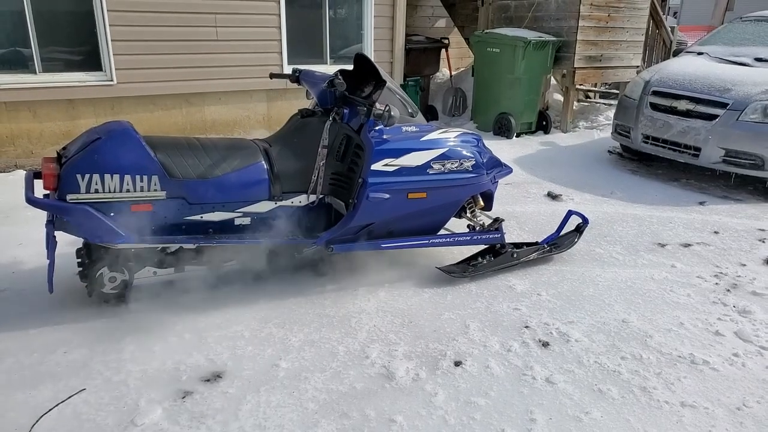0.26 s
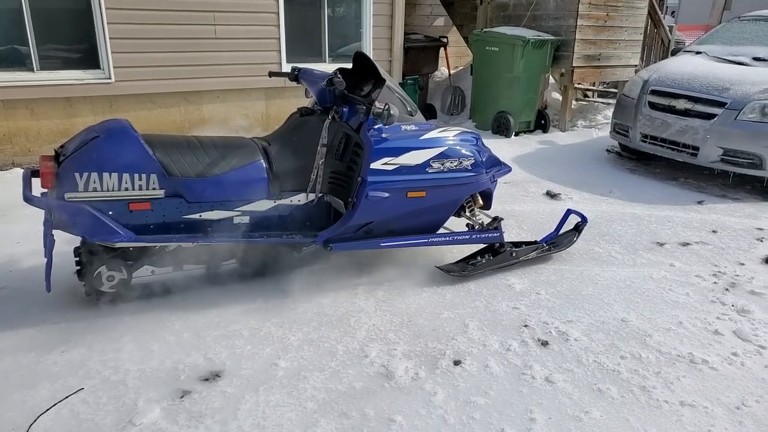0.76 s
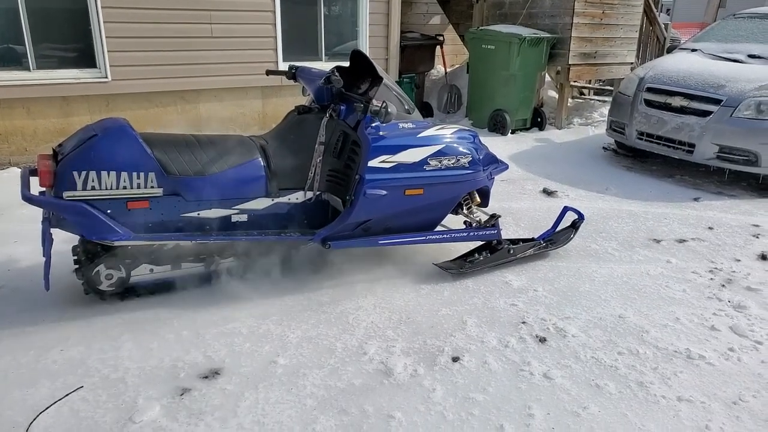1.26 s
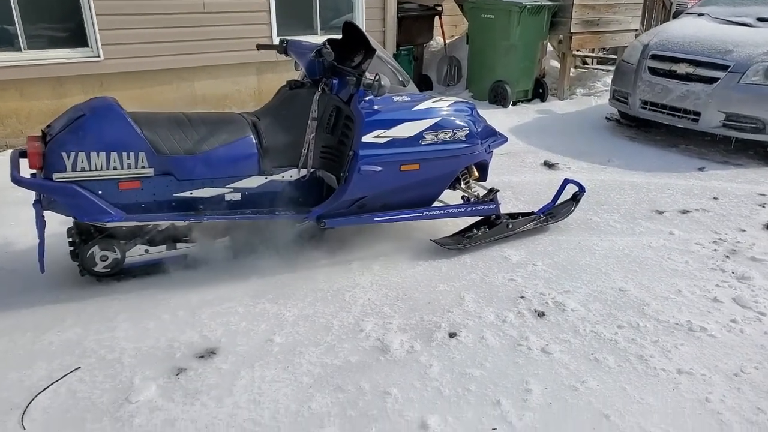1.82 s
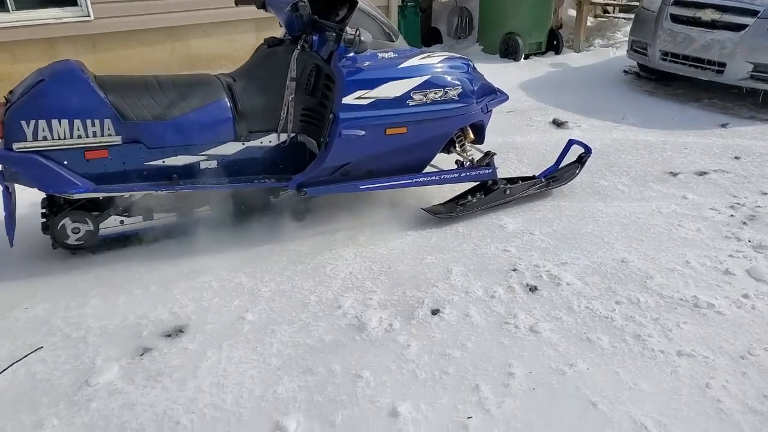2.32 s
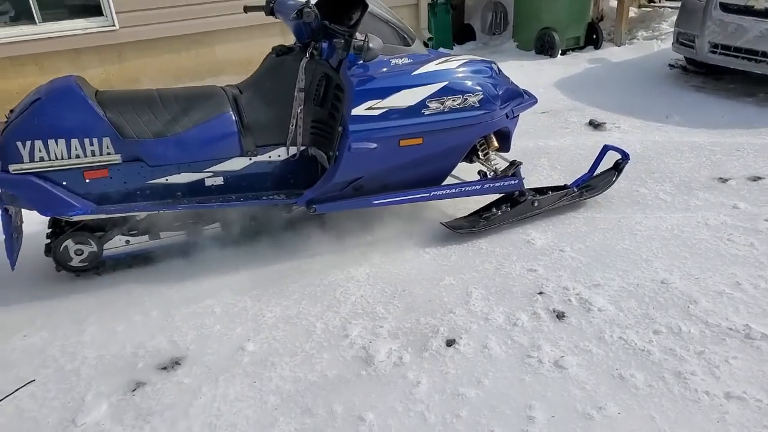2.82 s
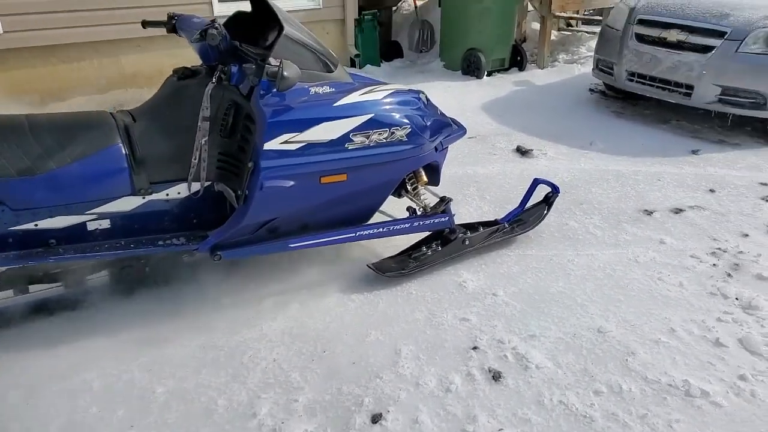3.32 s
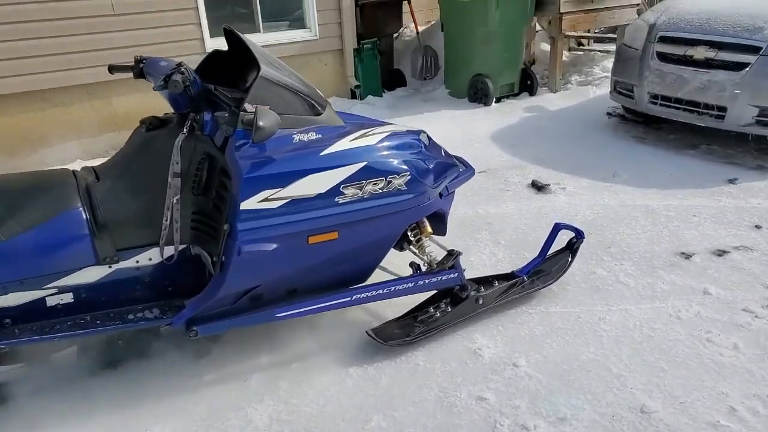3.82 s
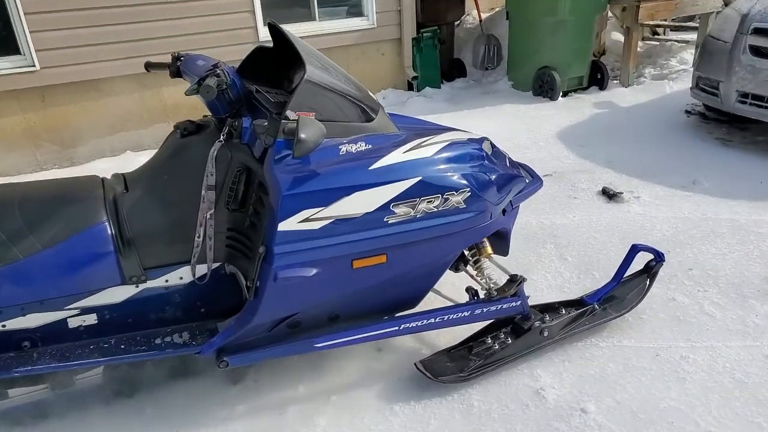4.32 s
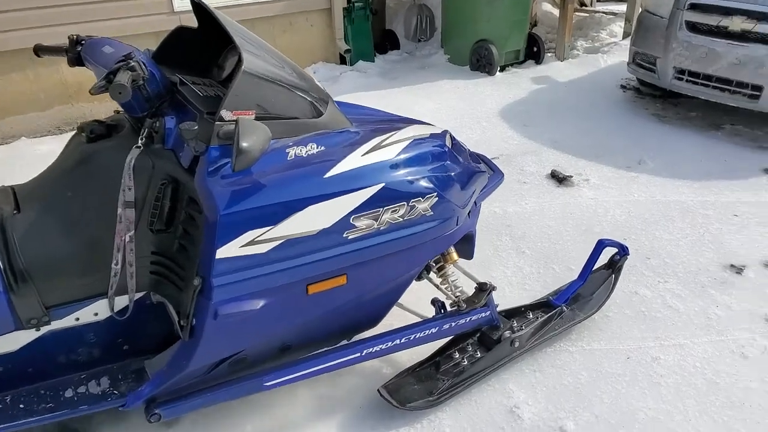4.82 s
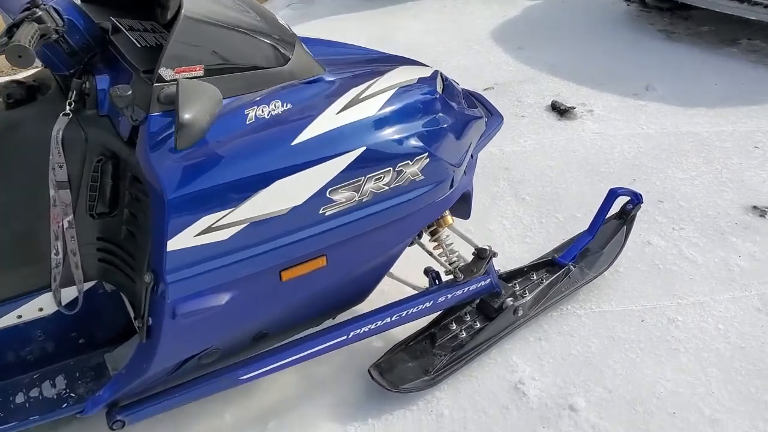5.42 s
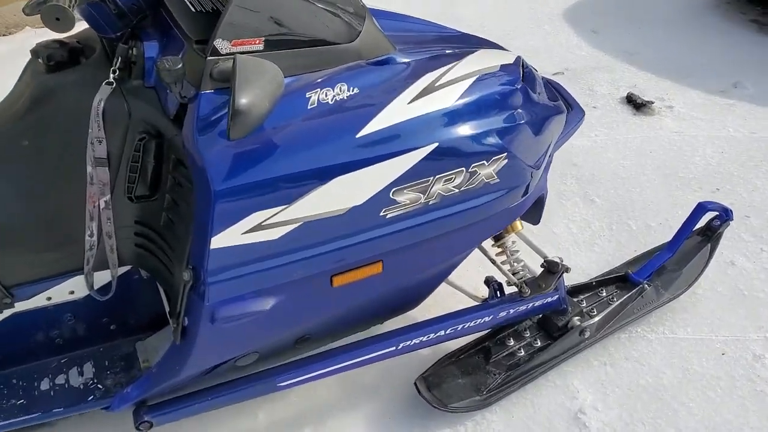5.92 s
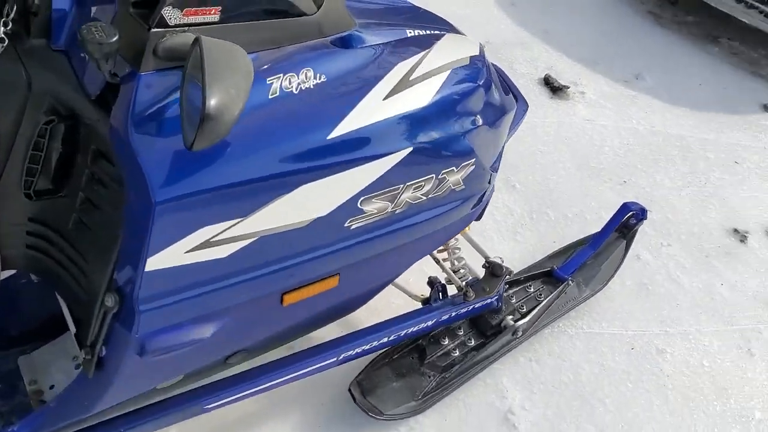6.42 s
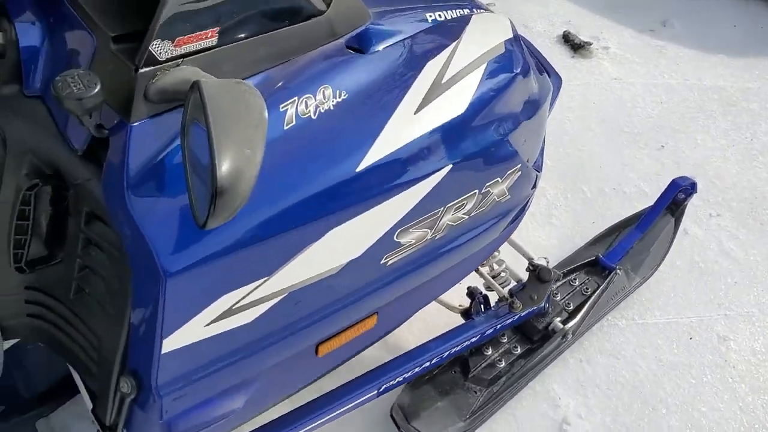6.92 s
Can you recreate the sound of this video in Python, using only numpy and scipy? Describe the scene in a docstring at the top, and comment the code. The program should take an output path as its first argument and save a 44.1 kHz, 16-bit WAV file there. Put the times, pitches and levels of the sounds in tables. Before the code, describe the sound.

From 0 s to about 7.1 s a two-stroke snowmobile idles roughly on snow beside a house, already running and never revving. Exhaust bangs arrive unevenly, about eighteen a second, in pairs, clusters and gaps. Each is a short low-mid boom with a crack, a spit of gas, a faint clutch clack and a hoarse bark; stronger ones stand out near 0.25, 0.6, 1.27, 2.55, 2.93, 3.4, 3.76 and 4.9 s. Between them weak strokes drone, tick and rustle over silencer rumble, with occasional soft thumps. Loose metal knocks once at 2.45 s. Until 3.1 s the stereo microphone stays at the side, with a short slap from the wall. By 3.6 s it is at the footboard, hissier and brighter. From 5.2 s it nears the hood: mechanical rustle rises, gas spits feel closer and their echo fades. The idle continues to the end.

```python
"""A three-cylinder two-stroke snowmobile idles on snow beside a house while the listener walks up to its hood.
From the start the engine rustles, ticks and drones, since most strokes burn weakly. At uneven moments a
built-up charge goes off: a crack, a spit of gas, a clack of the clutch, a boom in the pipe and a hoarse bark.
A short echo comes back from the house wall, and long gaps may hold a soft thump. At 2.4 s loose metal knocks.
From 3.1 s the listener goes from the side to the footboard, then from 5.2 s towards the hood."""
import sys
import numpy as np
from scipy import signal
from scipy.fft import rfft, irfft
from scipy.io import wavfile
from scipy.ndimage import uniform_filter1d

SR = 44100
rng = np.random.default_rng(int(sys.argv[2]) if len(sys.argv) > 2 else 0)


def wav_record(signal):
    """Record a signal, one row per channel, as 16-bit PCM in the file named by sys.argv[1]."""
    frames = np.transpose(np.atleast_2d(signal))
    bounded = np.clip(frames, -1, 1)
    # unit amplitude maps onto the largest positive 16-bit level
    quanta = np.round(bounded * 32767).astype(np.int16)
    wavfile.write(sys.argv[1], SR, quanta)


N = 315756
TIME = np.arange(N) / SR  # seconds

# bangs of the exhaust: (time [s], strength of the burn [dB])
BANGS = [(0.0004, -12.5), (0.0358, -9.5), (0.1235, -5.5), (0.1488, -8), (0.2483, 0), (0.2724, -7),
         (0.2969, -11), (0.309, -10.5), (0.407, -11), (0.4198, -9.5), (0.497, -7.0), (0.51, -10),
         (0.5606, -7), (0.6106, -6.0), (0.6228, -1), (0.6839, -16), (0.7098, -6.5), (0.8341, -9.5),
         (0.8849, -4.5), (0.897, -7), (0.9466, -8.5), (1.0093, -7.5), (1.06, -14), (1.0995, -12.0),
         (1.1641, -6), (1.2151, -12.0), (1.2541, -12), (1.267, -1.5), (1.3174, -9.5), (1.408, -6.5),
         (1.4614, -4), (1.487, -11), (1.5263, -10.5), (1.6329, -9.5), (1.6603, -6), (1.6866, -8),
         (1.753, -5.5), (1.7655, -9.5), (1.8154, -3), (1.8807, -9.5), (1.907, -8.5), (1.9578, -10),
         (2.0361, -14), (2.0494, -4), (2.061, -6), (2.111, -7.5), (2.228, -10.5), (2.241, -8),
         (2.2548, -5.5), (2.3042, -8), (2.3892, -9), (2.4091, -6.5), (2.4597, -8.0), (2.5239, -6.5),
         (2.5492, -1.0), (2.61, -9), (2.7128, -9.5), (2.7642, -5.5), (2.8291, -6.5), (2.919, -17),
         (2.932, 0.0), (2.9566, -7.5), (2.9807, -7.5), (3.107, -6.0), (3.1316, -5.5), (3.2197, -5.5),
         (3.284, -5.5), (3.3345, -10), (3.3847, -0.5), (3.4342, -8.5), (3.4463, -11), (3.5996, -10.0),
         (3.6132, -8.5), (3.626, -7.5), (3.638, -9), (3.7635, 0), (3.813, -5.5), (3.8605, -12.0),
         (3.96, -6.0), (3.972, -6), (4.0215, -1.5), (4.082, -6.5), (4.1054, -6.5), (4.217, -11.5),
         (4.2295, -7.0), (4.3319, -7.5), (4.3579, -2), (4.3835, -13), (4.4223, -6), (4.4465, -5.0),
         (4.537, -12.5), (4.5758, -9), (4.601, -4), (4.6407, -7), (4.7019, -8), (4.7269, -4),
         (4.8107, -8.5), (4.8489, -8.5), (4.8997, -0.5), (4.9967, -3), (5.1354, -6), (5.1986, -6.5),
         (5.225, -8.5), (5.2887, -6), (5.3773, -4.5), (5.3908, -2.5), (5.44, -6), (5.525, -5.5),
         (5.6165, -2), (5.6277, -5.5), (5.6758, -6), (5.7731, -6.5), (5.8992, -6), (5.9112, -2),
         (6.008, -9.5), (6.11, -6), (6.1617, -5), (6.213, -1.5), (6.2644, -7.5), (6.3135, -9),
         (6.4179, -5.5), (6.4692, -9), (6.4824, -9.5), (6.5072, -9), (6.572, -5.0), (6.6235, -10),
         (6.6739, -4.0), (6.726, -12.5), (6.7758, -9), (6.8772, -6), (6.9266, -7), (6.9772, -3.5),
         (7.028, -8.5), (7.039, -5), (7.1373, -7.0)]
# the walk: (time [s], place [0 side, 1 footboard, 2 hood])
WALK_PLACES = [(0, 0.082), (3.1, 0), (3.6, 1.026), (5.15, 1.04), (5.7, 1.61), (7.1, 1.93)]
# running noise along the walk: (time [s], relative level [dB])
RUNNING_LEVEL = [(0.0, -28), (3.7, -28), (4.57, -25), (5.74, -25), (7.16, -21)]
# colour of the running noise from the side: (frequency [Hz], relative level [dB])
SIDE_COLOUR = [(260, -15), (450, -2), (741, -2), (951, -16), (1170, -4), (1390, -11.5), (1540, -12),
               (1810, -9.5), (2360, -21.5), (3120, -15.5), (4120, -30), (5220, -24.5), (6790, -33),
               (8460, -38), (15000, -52)]
# the same at the footboard: (frequency [Hz], relative level [dB])
BOARD_COLOUR = [(260, -10), (450, -2), (794, -4), (882, -9.5), (1150, -0.5), (1470, -10.5), (1750, -5),
                (2100, -21), (2400, -22), (3190, -15.5), (4170, -32), (6430, -21), (8540, -34),
                (14800, -26.5), (16000, -38)]
# the same over the hood: (frequency [Hz], relative level [dB])
HOOD_COLOUR = [(260, 6.5), (450, -6), (507, -8.5), (726, -9.5), (950, -1.5), (1140, 2), (1260, -31),
               (1360, -22), (1860, -12), (2790, -27), (3490, -31), (4110, -30.5), (6060, -40), (9340, -45),
               (15100, -32), (16000, -45)]
# gas rumbling through the silencer: (frequency [Hz], relative level [dB])
RUMBLE_COLOUR = [(20, -19), (40, -10.5), (55, -5.5), (80, -20), (105, 3.5), (135, 0), (170, 0.5),
                 (205, 3.5), (245, -4.5), (310, -4.5), (400, -1), (520, -25), (900, -45)]
# steel shell of the pipe, struck by the pressure front: (base frequency [Hz], width [Hz],
# relative level from the side [dB], at the footboard [dB], over the hood [dB])
SHELL_MODES = [(1119, 112, -24, -12.5, -19), (1825, 123, -5.5, -10.5, -16), (1983, 236, 0, 0.5, -3.5),
               (2290, 394, -2, -1.5, 3), (3130, 289, -6.5, -2.5, -37), (3400, 258, -11, -6.5, -24.5)]
# colour of the escaping gas: (frequency [Hz], relative level [dB])
SPIT_COLOUR = [(2000, 2), (2800, -26), (3400, -17), (4250, -13.5), (5250, 2), (5900, 0), (6850, 1),
               (8600, -13), (11000, -4.5), (13000, -9), (15200, 1.5), (16200, -4)]
# rattle of the clutch: (base frequency [Hz], width [Hz], relative level [dB])
CLUTCH_MODES = [(1767, 25, -10.5), (3000, 260, 2.5), (3250, 210, -8), (3600, 280, -14)]
# clutch as heard from the side, at the footboard and over the hood: (relative level [dB])
CLUTCH_PLACE_DB = [-31.5, -33.5, -41]
# exhaust pipe and silencer: (frequency [Hz], width [Hz], relative level [dB])
PIPE_MODES = [(95.3, 25.6, -8), (121.2, 77, -9.5), (219, 15.8, -17.5), (313.4, 86.1, -1.5),
              (322.8, 57.4, 2.25), (340.7, 32, -14), (473.4, 66, -21)]
# hoarse colour of the outlet: (frequency [Hz], relative level [dB])
BARK_COLOUR = [(200, -84), (420, -5), (560, 0.5), (680, -3), (850, -5.5), (1100, -6), (1400, -7),
               (1750, -7.5), (2500, -29), (5000, -35)]
# a lone knock of loose metal: (time [s], level [dB])
KNOCKS = [(2.4489, -21.5)]
# ring of the knock: (base frequency [Hz], width [Hz], relative level [dB])
KNOCK_MODES = [(1210, 140, -3), (1650, 360, -8), (2720, 900, -6), (5200, 2500, -20)]
# how much more the left microphone hears than the right: (frequency [Hz], difference [dB])
EAR_BALANCE = [(60, -0.5), (110, 1), (200, 0.5), (380, -1.5), (700, -1.5), (1290, 4), (2380, -0.5),
               (4400, -5), (8120, 3.5), (15000, 1)]

STROKE_S = .0127  # rough spacing, used to count the strokes between bangs
# the boom grows slowly with the strength: relative level at 0 dB strength, dB per dB, dB per step of the walk
BOOM_DB, BOOM_SLOPE, BOOM_NEAR_DB = 0.78, 0.29, -0.88
# the crack grows fast, until the pressure front is fully steep at the knee: relative top level, dB per dB, knee
CRACK_DB, CRACK_SLOPE, CRACK_KNEE_DB = -20, 1.23, -3.5
# only strong burns spit much: relative level at 0 dB strength, dB per dB, dB per step of the walk
SPIT_DB, SPIT_SLOPE, SPIT_NEAR_DB = -27.5, 1.76, 3.5
GRAIN_HZ, GRAIN_DB = 1104, 2.5  # tiny gusts in the spitting gas: how often they change, and depth
# after this many strokes the cylinders have refilled and a soft thump may come: chance, relative level
REFILL_STROKES, THUMP_CHANCE, THUMP_DB = 4, 0.66, -8.5
TOP_HZ = 15850  # the microphones cut everything above


def undb(db):
    """Turn decibels into gain."""
    return 10 ** (np.asarray(db) / 20)


def curve(rows):
    """Join (time, value) rows by straight lines."""
    return np.interp(TIME, *np.transpose(rows))


def colour_db(points):
    """Read a colour table at every frequency of the spectrum, evenly in pitch."""
    hz, db = np.transpose(points)
    spectrum_hz = np.arange(N // 2 + 1) * SR / N
    return np.interp(np.log(spectrum_hz + 1), np.log(hz), db)


def walk(rate):
    """Random levels that change `rate` times a second, smoothed twice; spread near 1."""
    hold = int(SR / rate)
    levels = np.repeat(rng.standard_normal(N // hold + 1), hold)
    smooth = uniform_filter1d(uniform_filter1d(levels, hold), hold)
    return 1.84 * smooth[:N]


def noise(points, channels=2):
    """Unrelated noises of overall rms 1, shaped to a colour table."""
    spectrum_hz = np.arange(N // 2 + 1) * SR / N
    low_cut = np.minimum(spectrum_hz / points[0][0], 1) ** 4  # steep fall below the lowest point
    white = rng.standard_normal((channels, N))
    coloured = irfft(rfft(white) * undb(colour_db(points)) * low_cut, N)
    return coloured / coloured.std()


def pulses(times, sizes):
    """One click at each time."""
    return np.bincount(np.maximum(times * SR, 0).astype(int), sizes, N)[:N]


def ring(x, response):
    """Pass a sound through an impulse response."""
    return signal.fftconvolve(np.atleast_2d(x), np.atleast_2d(response), axes=1)[:, :N]


def puffs(times, db, rise_s, fall_s):
    """Loudness of gas puffs that swell fast and die away; their powers add."""
    t = TIME[:SR // 8]
    shape = (1 - np.exp(-t / rise_s)) * np.exp(-t / fall_s)
    power_shape = (shape / shape.max()) ** 2
    power = ring(pulses(times, undb(db) ** 2), power_shape)
    return np.sqrt(np.abs(power))


def mode(t, hz, width):
    """Free ringing of one resonance; a wide one dies sooner."""
    return np.exp(-np.pi * width * t) * np.cos(2 * np.pi * hz * t + np.arctan(width / hz / 2))


def strike(times, db, modes, mode_db, pitch, rise_s, detune, vary_db):
    """Blows on (Hz, width) resonances, each with its own mix; db is the level of the first milliseconds."""
    t = TIME[:SR // 25]
    hz, width = modes.T[:, :, None]
    # broad resonances belong to the hot gas and move; narrow ones are metal and nearly stay
    freedom = np.minimum(width / 300, 1) ** 2
    swell = (1 - np.exp(-t / rise_s)) ** 2
    chance = rng.standard_normal((len(times), 2, len(modes), 1))
    out = np.zeros(N + SR)
    for when, level, mix_db, ratio, (shift, size) in zip(times, db, mode_db, pitch, chance):
        moved_hz = hz * (1 + (ratio - 1 + detune * shift) * freedom)
        loudness = undb(mix_db[:, None] + vary_db * size)
        blow = np.sum(loudness * mode(t, moved_hz, width), axis=0) * swell
        start = int(max(when, 0) * SR)
        out[start:start + len(t)] += blow * undb(level) / blow[:SR // 220].std()
    return out[:N]


def ports(x, lag_s):
    """The sound reaches the left microphone first, the right one a little later."""
    return np.array([x, np.interp(TIME - lag_s, TIME, x)])


def strokes():
    """Times of all strokes and the indices of the bangs; the crank turns evenly between bangs."""
    bang_s = np.array(BANGS)[:, 0]
    steps = np.maximum(1, np.round(np.diff(bang_s) / STROKE_S))
    hard = np.r_[0, np.cumsum(steps)].astype(int)
    return np.interp(np.arange(hard[-1] + 1), hard, bang_s), hard


def burn(strength_db, place):
    """Boom, crack and spit levels of the bangs: boom also depends on the place, crack stops growing at its knee."""
    boom_db = BOOM_DB + BOOM_SLOPE * strength_db + BOOM_NEAR_DB * place
    crack_db = CRACK_DB + CRACK_SLOPE * np.minimum(strength_db - CRACK_KNEE_DB, 0)
    spit_db = SPIT_DB + SPIT_SLOPE * strength_db
    return boom_db, crack_db, spit_db


def after_burn(times, hard, bang_db, idle_db, drop_db, scatter_db):
    """Level of every stroke: after a bang they weaken towards the idle level, with random scatter."""
    index = np.arange(len(times))
    last = np.searchsorted(hard, index, side="right") - 1
    fading_db = bang_db[last] - drop_db * np.sqrt(index - hard[last])
    db = np.maximum(fading_db, idle_db) + scatter_db * rng.standard_normal(len(times))
    db[hard] = bang_db
    return db


def running(times, place, gain_db=-1, tick_db=-1, scatter_db=3, steady=0.7, common=0.27):
    """Pistons and belt rustle on and tick with each stroke; the colour follows the listener's place."""
    rustle = 0
    for k, colour in enumerate((SIDE_COLOUR, BOARD_COLOUR, HOOD_COLOUR)):
        nearness = np.maximum(1 - np.abs(place - k), 0)
        rustle = rustle + np.sqrt(nearness) * noise(colour, channels=3)
    # part comes straight from the engine, the rest leaks out all round the hood
    straight = np.sqrt(common) * ports(rustle[2], lag_s=0.00022)
    leaked = np.sqrt(1 - common) * rustle[:2]
    stroke_db = tick_db + scatter_db * rng.standard_normal(len(times))
    ticks = puffs(times + 0.00195, stroke_db, rise_s=0.00017, fall_s=0.011)
    return (straight + leaked) * np.hypot(steady, ticks) * undb(curve(RUNNING_LEVEL) + gain_db)


def drone(times, bang_s, place, near_db=1.5, break_db=-9):
    """Weak strokes puff evenly: a gently wavering tone at the stroke rate and its octave, dipping at each bang."""
    phase = 2 * np.pi * np.interp(TIME, times, np.arange(len(times)))
    tone = 0
    for k, db in ((1, -24), (2, -21.5)):
        tone = tone + undb(db + 2 * walk(18)) * np.sin(k * phase + .25 * walk(20))
    broken = np.minimum(puffs(bang_s, np.zeros(len(bang_s)), rise_s=0.0082, fall_s=0.014)[0], 1)
    return tone * undb(near_db * place + break_db * broken)


def gas_rumble():
    """Gas flowing through the silencer makes a steady low noise."""
    return undb(-25) * ports(noise(RUMBLE_COLOUR, channels=1)[0], lag_s=.00014)


def cracks(times, db, place, lag_s=.0006, rise_s=0.0012, steepen=0.059, knee_db=-20.5, hood_db=2, heat=0.03):
    """The pressure front cracks against the pipe shell; hard fronts and hot charges sound higher."""
    shell = np.array(SHELL_MODES)
    where = np.interp(times, TIME, place)
    mode_db = np.transpose([np.interp(where, np.arange(3), row[2:]) for row in shell])
    # the heat of each charge is drawn at random
    pitch = 1 + steepen * np.maximum(db - knee_db, 0) + heat * rng.standard_normal(len(times))
    heard_db = db + hood_db * where / 2
    return strike(times + lag_s, heard_db, shell[:, :2], mode_db, pitch, rise_s, detune=0.026, vary_db=4.5)


def spits(times, db, place, lag_s=0.0014, shade_hz=8500, close_db=4, side_db=-9, sharpen=0.061, knee_db=-28):
    """Gas spits out just after the crack, brighter when hard; from the side the hood shades its highest hiss."""
    hiss = noise(SPIT_COLOUR) * undb(GRAIN_DB * walk(GRAIN_HZ))
    high_pass = signal.butter(4, shade_hz, "high", fs=SR, output="sos")
    top = signal.sosfiltfilt(high_pass, hiss)
    snap = (hiss - top) * puffs(times + lag_s, db + 5.5, rise_s=0.0005, fall_s=0.0032)
    fizz_db = db + sharpen * (db - knee_db)
    fizz = top * puffs(times + lag_s, fizz_db, rise_s=0.0023, fall_s=0.0044)
    shade_db = np.interp(place, [0, 1], [side_db, 0])
    return snap + fizz * undb(close_db + shade_db)


def rattle(times, jerk_db, place, scatter_db=2, lag_s=0.001853, loose_s=0.00045):
    """Loose clutch weights clack when a bang jerks the crank and settle within a few strokes."""
    clutch = np.array(CLUTCH_MODES)
    size, late = rng.standard_normal((len(times), 2)).T
    where = np.interp(times, TIME, place)
    heard_db = np.interp(where, np.arange(len(CLUTCH_PLACE_DB)), CLUTCH_PLACE_DB)
    db = jerk_db + heard_db + scatter_db * np.minimum(size, 1)
    mode_db = np.tile(clutch[:, 2], (len(times), 1))
    clack_s = times + lag_s + loose_s * late
    return strike(clack_s, db, clutch[:, :2], mode_db, np.ones(len(times)), rise_s=.0002, detune=.04, vary_db=4)


def exhaust(times, fired, boom_db, weak_db=-24, scatter_db=4, lag_s=0.00255, soft_hz=770, gain_db=51.5):
    """Each stroke sends a rounded pressure pulse down the pipe, which booms at its resonances."""
    db = weak_db + scatter_db * rng.standard_normal(len(times))
    db[fired] = boom_db
    t = TIME[:SR // 6]
    pipe = 0
    for k, (hz, width, level_db) in enumerate(PIPE_MODES):
        sense = -(-1) ** k  # neighbouring resonances swing in opposite senses
        pipe = pipe + sense * undb(level_db) * 2 * np.pi * width / SR * mode(t, hz, width)
    push = t * np.exp(-2 * np.pi * soft_hz * t)
    pipe_sound = ring(pulses(times + lag_s, undb(db + gain_db)), pipe)
    return ring(pipe_sound, push / push.sum())[0]


def barks(times, boom_db, place, bark_db=-20.5, near_db=1, lag_s=0.008):
    """Each charge leaves the outlet as a short hoarse burst of noise."""
    hoarse = noise(BARK_COLOUR, channels=3)
    hoarse = 0.85 * ports(hoarse[2], lag_s=.0003) + 0.74 * hoarse[:2]  # straight and scattered
    burst = puffs(times + lag_s, boom_db + bark_db, rise_s=0.00066, fall_s=0.0033)
    return hoarse * burst * undb(near_db * place)


def yard(x, wall_s=0.02, wall_db=-12, tail_db=-1.0, t60_s=0.15, build_s=0.00053, dull_hz=11000):
    """One slap from the house wall and a short scatter from the sled, fence and car; snow dulls both."""
    t = TIME[:SR // 3]
    tail = rng.standard_normal((2, len(t))) * undb(-60 * t / t60_s) * (1 - np.exp(-t / build_s))
    response = tail * undb(tail_db) / np.linalg.norm(tail[0])
    response[:, int(wall_s * SR)] += undb(wall_db)
    low_pass = signal.butter(2, dull_hz, fs=SR, output="sos")
    return ring(x, signal.sosfilt(low_pass, response))


def thumps(hard):
    """Pick the strokes that half catch, by chance, in the long gaps between bangs."""
    long_gap = np.diff(hard) > REFILL_STROKES + 1
    due = hard[:-1][long_gap] + REFILL_STROKES
    return due[rng.random(len(due)) < THUMP_CHANCE]


def knocks():
    """A loose panel knocks once and rings briefly."""
    times, db = np.transpose(KNOCKS)
    modes = np.array(KNOCK_MODES)
    return strike(times, db, modes[:, :2], [modes[:, 2]], [1], rise_s=0.00014, detune=.01, vary_db=6.5)


def scene():
    """The engine's strokes drive most layers; the hiss's echo fades as the listener comes close."""
    bang_s, strength_db = np.transpose(BANGS)
    times, hard = strokes()
    place = np.clip(curve(WALK_PLACES), 0, 2)
    boom_db, crack_db, spit_db = burn(strength_db, np.interp(bang_s, TIME, place))
    soft = thumps(hard)
    fired = np.r_[hard, soft]
    fired_db = np.r_[boom_db, np.full(len(soft), THUMP_DB)]

    engine = running(times, place)
    hum = drone(times, bang_s, place)
    rumble = gas_rumble()
    crack_db = after_burn(times, hard, crack_db, idle_db=-43, drop_db=16.5, scatter_db=2.0)
    crack = cracks(times, crack_db, place)
    spit_db = after_burn(times, hard, spit_db, idle_db=-67.5, drop_db=18, scatter_db=7.5)
    spit = spits(times, spit_db, place) * undb(SPIT_NEAR_DB * place)
    jerk_db = after_burn(times, hard, boom_db, idle_db=-15, drop_db=14, scatter_db=3)
    clack = rattle(times, jerk_db, place)
    boom = exhaust(times, fired, fired_db) + hum
    bark = barks(times[fired], fired_db, place)
    metal = crack + clack + knocks()  # everything that rings

    direct = ports(boom, lag_s=.00016) + ports(metal, lag_s=.00009) + spit
    # almost none of the boom goes into the echo
    echo = yard(metal + spit * undb(2 - 5.2 * place) + boom * undb(-60.0))
    return direct + echo + bark + rumble + engine


def record(dry):
    """Two microphones colour the sound in opposite ways, and a steep filter cuts the top."""
    left_db = colour_db(EAR_BALANCE)
    heard = irfft(rfft(dry) * undb(np.array([left_db, -left_db]) / 2), N)
    return signal.sosfilt(signal.ellip(10, .2, 80, TOP_HZ, fs=SR, output="sos"), heard)


dry = scene()
out = record(dry)
wav_record(out)
```